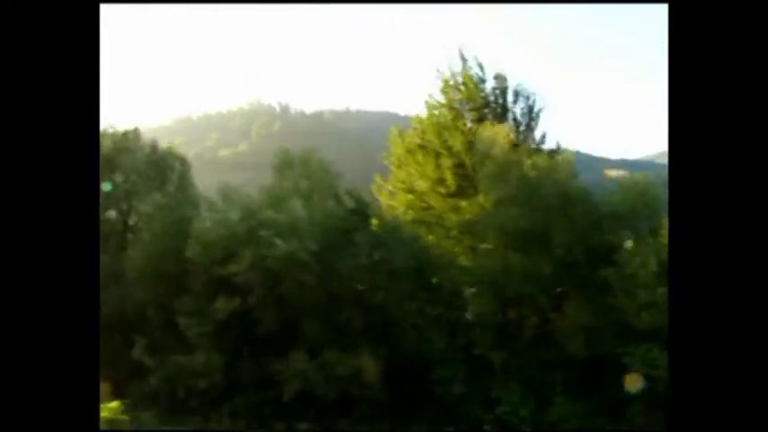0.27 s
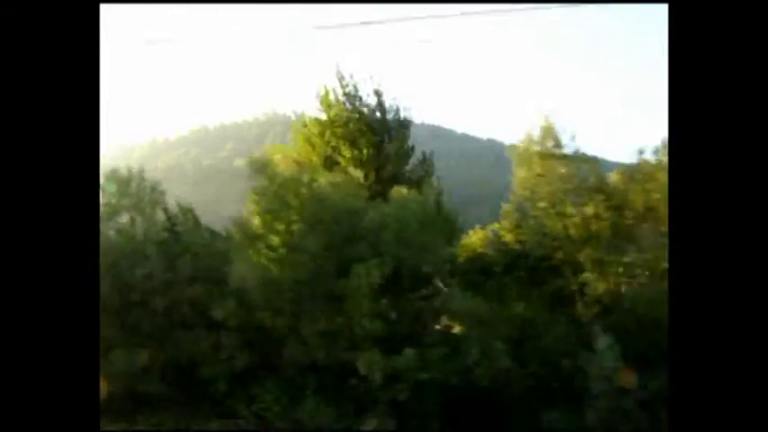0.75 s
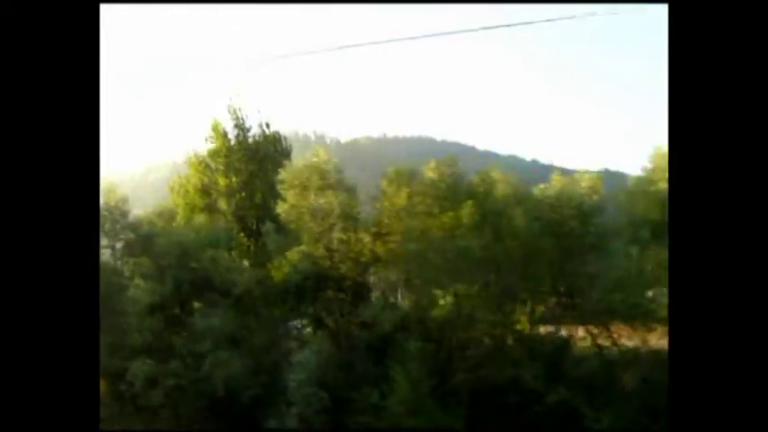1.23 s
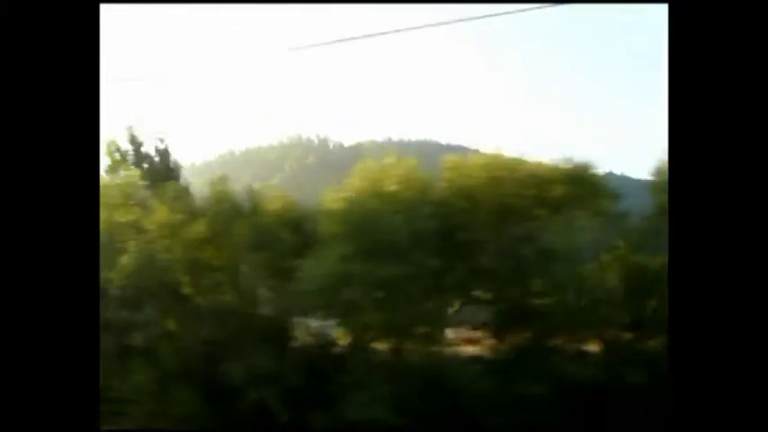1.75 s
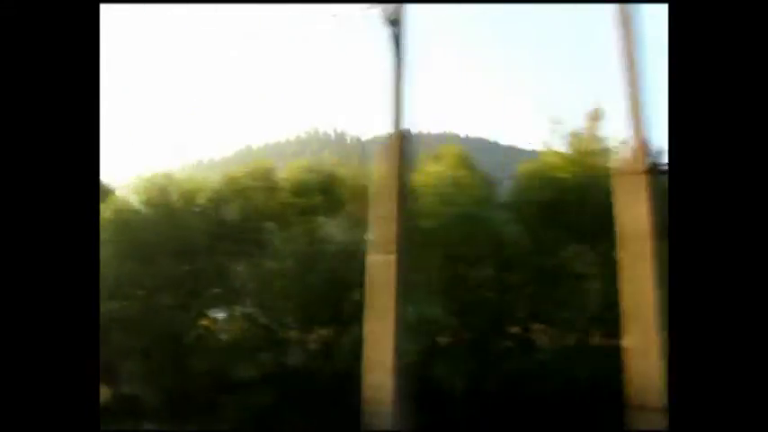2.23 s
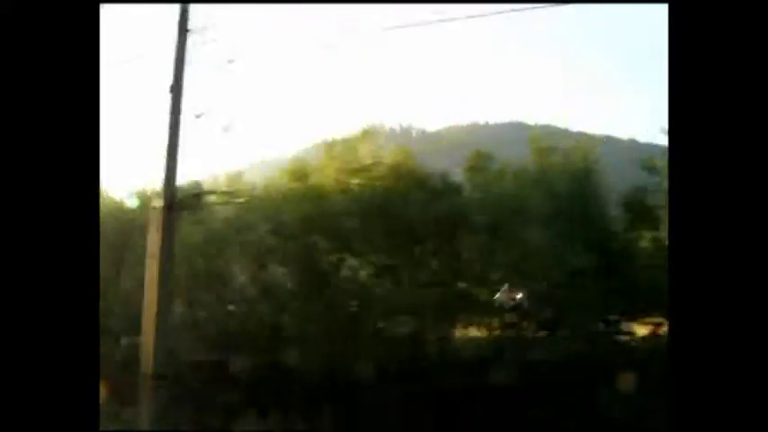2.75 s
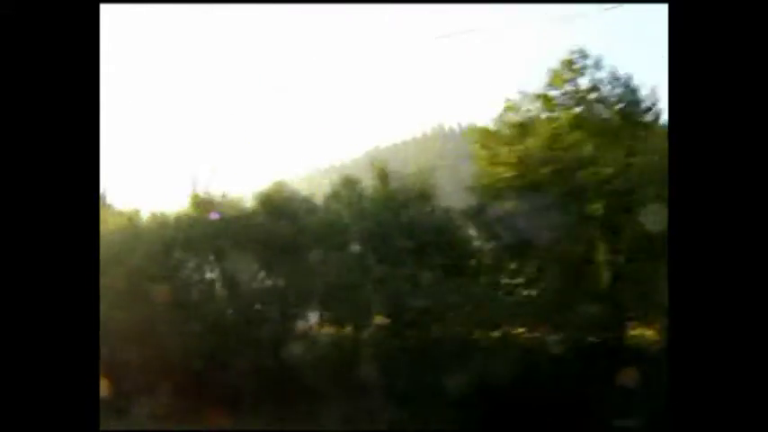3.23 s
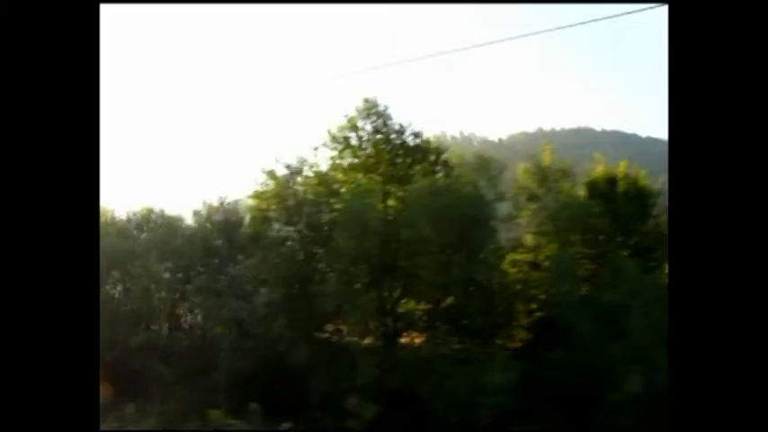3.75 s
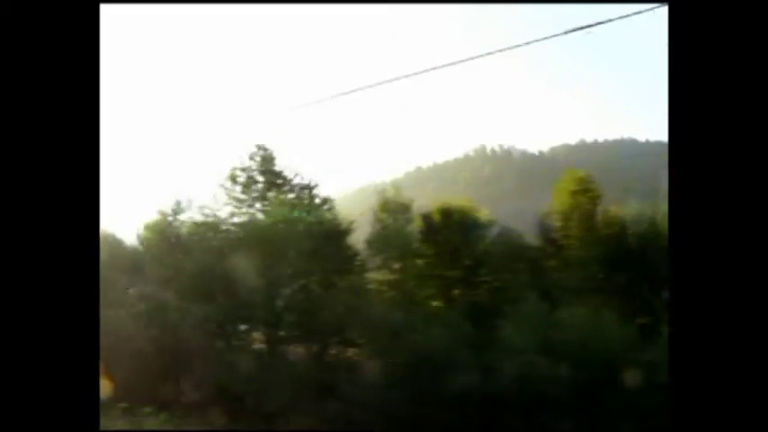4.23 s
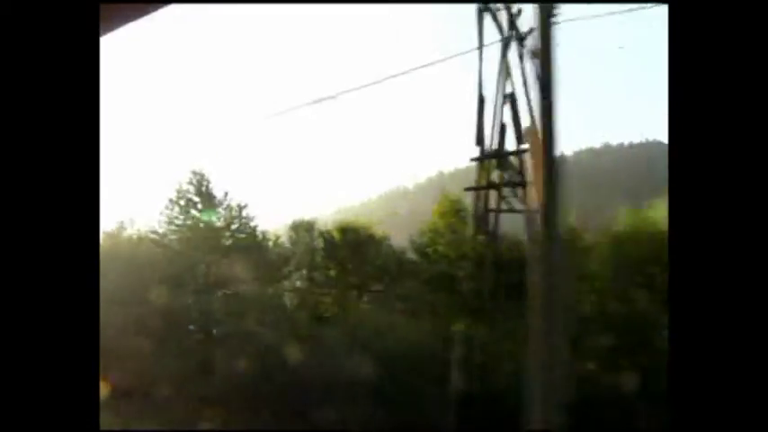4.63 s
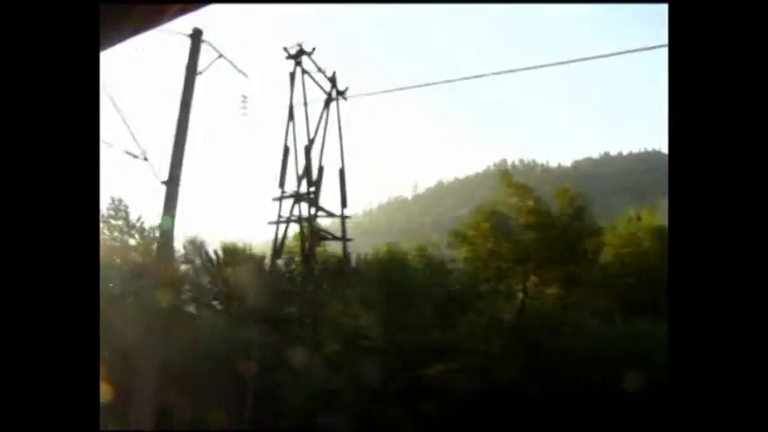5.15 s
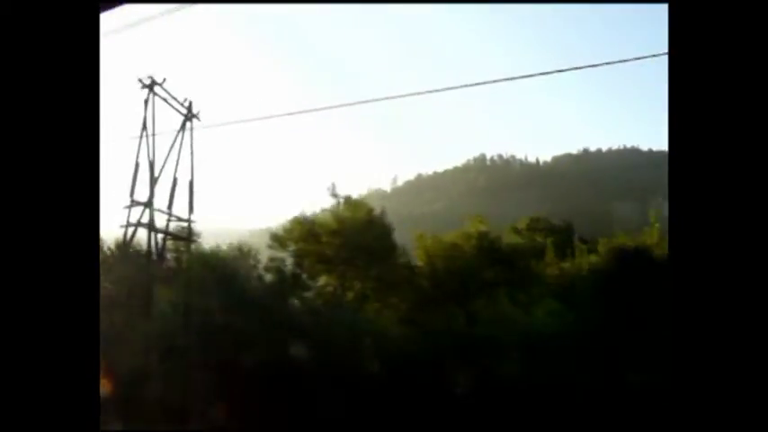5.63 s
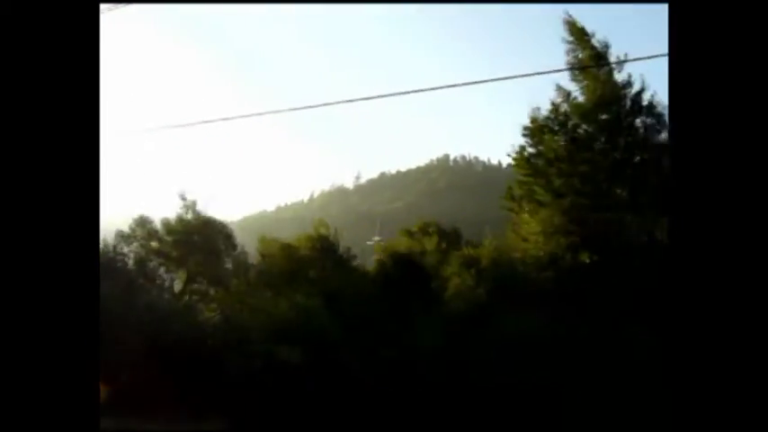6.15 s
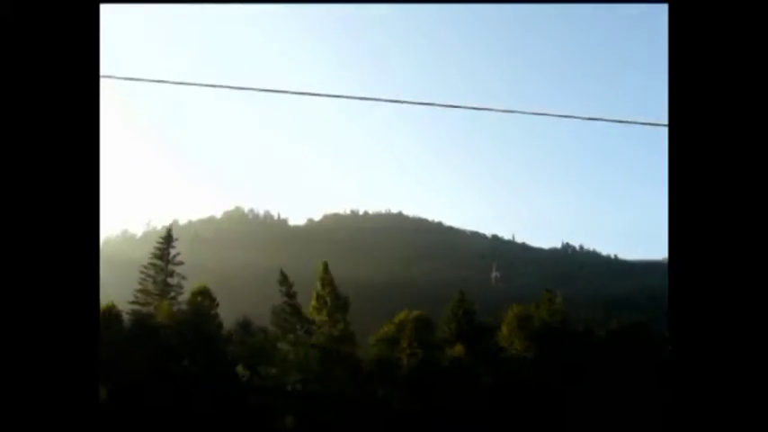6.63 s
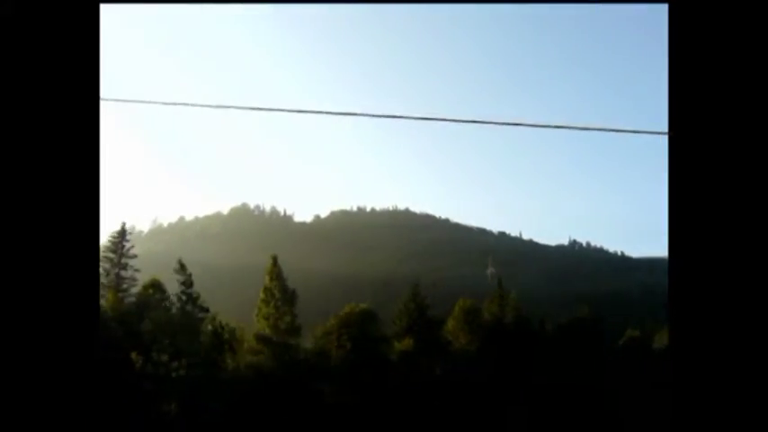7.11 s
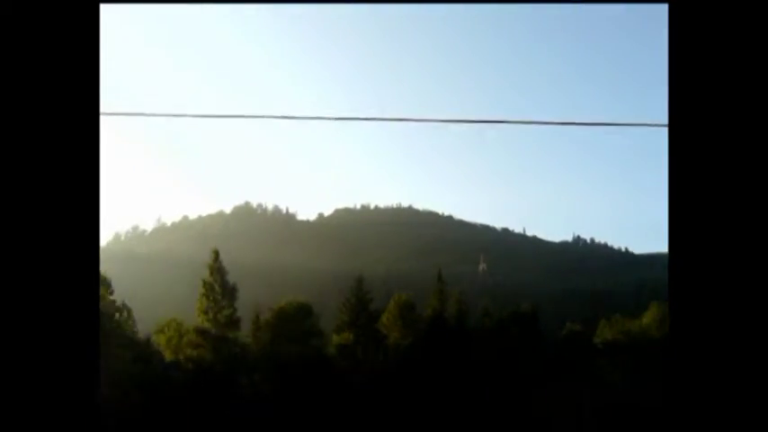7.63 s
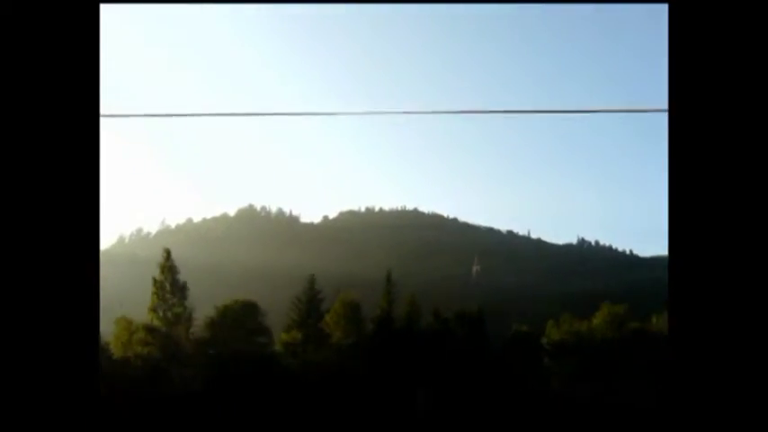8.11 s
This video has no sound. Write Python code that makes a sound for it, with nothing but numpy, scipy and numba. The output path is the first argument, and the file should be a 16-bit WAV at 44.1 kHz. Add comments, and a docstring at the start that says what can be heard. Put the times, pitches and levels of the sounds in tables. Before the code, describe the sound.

Muffled train roar with paired rail-joint knocks and buffeting wind, jumping after six seconds to a much louder, thumping, wind-battered stretch.

```python
"""A passenger train rolls along, heard from an open carriage window on a small camera: an uneven roar and hiss
of wheels, far stronger on a new stretch of track after 6.35 s, with double knocks, fluttering wind and sharp pops.
The roar is shaped noise exciting drifting resonances; at each joint two noisy contacts ring a bogie.
The wind is noise in gusts, lopsided pressure swings and single spikes on the microphone.
A gain control starts turned down, ducks under sounds above its limit and creeps back."""
import sys
import numpy as np
from scipy import signal
from scipy.fft import rfft, irfft
from scipy.io import wavfile
from scipy.ndimage import map_coordinates
from numba import njit

SR = 44100
rng = np.random.default_rng(int(sys.argv[2]) if len(sys.argv) > 2 else 0)


def generate_wav(signal):
    """Clip the signal to [-1, 1] and save it as 16-bit WAV at the path in sys.argv[1]."""
    frames = np.transpose(np.atleast_2d(signal))
    scaled = np.clip(frames, -1, 1) * 32767
    pcm = np.round(scaled).astype(np.int16)
    wavfile.write(sys.argv[1], SR, pcm)


N = 369116
TIME = np.arange(N) / SR
TOP_HZ = 4800  # upper edge of the camera's pass band


def undb(db):
    """Level definition: decibels to amplitude gain."""
    return 10 ** (np.asarray(db) / 20)


def unit(x):
    """Normalisation: scale to rms 1."""
    return x / np.sqrt(np.mean(x ** 2))


def curve(rows):
    """Linear interpolation: join (s, value) rows by straight lines."""
    return np.interp(TIME, *np.transpose(rows))


def walk(rate):
    """Band-limited fluctuation: random values, rate per second, joined by lines; spread near 1."""
    knots = rng.standard_normal(2048)
    return 1.04 * np.interp(TIME * rate, np.arange(len(knots)), knots)


def soften(x, hz, order=2):
    """Low-pass filtering: Butterworth, with the cut-off held to the top of the pass band."""
    sos = signal.butter(order, min(hz, TOP_HZ), fs=SR, output="sos")
    return signal.sosfilt(sos, x)


def band(x, lo_hz, hi_hz, order=2):
    """Band-pass filtering: Butterworth, at least 10 Hz wide."""
    edges = [lo_hz, max(hi_hz, lo_hz + 10)]
    return signal.sosfilt(signal.butter(order, edges, "band", fs=SR, output="sos"), x)


def ring(x, hz, width):
    """Resonance: one damped mode, gain 1 at its centre; width in Hz."""
    return signal.lfilter(*signal.iirpeak(hz, hz / width, fs=SR), x)


def coloured(points):
    """Spectral shaping: weight the spectrum of white noise by (Hz, dB) points on a log frequency axis."""
    hz, db = np.transpose(points)
    freq = np.maximum(np.fft.rfftfreq(N, 1 / SR), 1)
    weight = undb(np.interp(np.log(freq), np.log(hz), db))
    return irfft(rfft(rng.standard_normal(N)) * weight, N)


def add(track, s, sound):
    """Superposition: mix a sound into the track at time s."""
    start = max(int(s * SR), 0)
    track[start:start + len(sound)] += sound[:N - start]


# Running noise at the window. Each row: time in seconds, level in dB before the rolling gain.
ROLLING_LEVEL = [(0, -38.5), (0.65, -44), (1.25, -38.5), (1.65, -39.5), (2.2, -41), (2.7, -38.5),
                 (3.4, -39.5), (3.75, -45.5), (4.08, -40), (4.3, -43.5), (4.8, -40.5), (5.8, -35.5),
                 (6.345, -37), (6.358, -24.5), (6.65, -23), (6.85, -20), (7.04, -21), (7.13, -27),
                 (7.7, -25.5), (7.9, -28.5), (8.36, -33)]
# Spectrum of the wheel roar. Each row: frequency in Hz, relative spectral level in dB.
ROAR_SPECTRUM = [(30, -17.5), (65, -6.5), (125, -9.5), (170, -7.5), (430, -6.5), (580, -7.5), (770, -9),
                 (910, -22), (1300, -21.5), (1900, -24), (2300, -17.5), (3400, -25), (3950, -34.5),
                 (4450, -36)]
# Hiss of the wheels against their roar. Each row: time in seconds, treble level in dB.
HISS_LEVEL = [(0, -3), (0.45, 1), (1.38, 2), (1.62, -2.5), (2.2, 0), (2.65, 3), (3.3, -0.5), (3.7, 3),
              (4.2, 0.5), (4.9, 0), (5.5, -0.5), (6.55, 0), (6.63, -3), (6.72, -0.5), (6.87, 0), (7.05, -2),
              (7.9, -1.5)]
# Resonances of bogie and carriage, which the joints ring too. Each row: frequency in Hz, width in Hz,
# relative level in the roar in dB, relative level in a knock in dB.
BOGIE_MODES = [(258, 35, 1.5, 9), (374, 44, -1.5, 3), (528, 69, -19.5, 4.5), (631, 20, -17, -1.5),
               (794, 88, -14, -5), (994, 59, -11, -12), (1080, 130, -32.5, -27.5), (1584, 90, -14.5, -31),
               (2120, 54, -31.5, -23), (3050, 140, -28, -29)]


def rolling(shake_db=0.66, hiss_flicker_db=2.1, mode_swell_db=2.5, mode_drift=0.02, rattle_db=3, gain_db=11):
    """Forced vibration: rail roughness drives wheels and an unevenly rattling body whose resonances drift."""
    roar = coloured(ROAR_SPECTRUM)
    body = signal.sosfiltfilt(signal.butter(2, 1200, fs=SR, output="sos"), roar)
    hiss = (roar - body) * undb(curve(HISS_LEVEL) + hiss_flicker_db * walk(14))
    rattle = unit(undb(rattle_db * walk(45)))
    for hz, width, db, _ in BOGIE_MODES:
        drive = soften(rng.standard_normal(N), 3000, order=6) * rattle
        # reading at a wandering speed shifts the pitch of the mode
        clock = np.cumsum(1 + mode_drift * walk(5))
        ringing = map_coordinates(ring(drive, hz, width), [clock], order=1, mode="mirror")
        body = body + ringing * undb(db + mode_swell_db * walk(8.1))
    shaken = body * undb(shake_db * walk(28))
    return unit(shaken + hiss) * undb(curve(ROLLING_LEVEL) + gain_db)


AXLE_GAP_S = 0.154  # the trailing wheel of a bogie meets the joint this much later
TRAIL_HARDNESS = 0.47  # its contact is softer: share of the leading wheel's cut-off
THUD_TOP_HZ = 450  # modes below this belong to the deep thud
# Bogies crossing rail joints. Each row: start in seconds, leading wheel level in dB, trailing wheel level
# in dB, hardness of the leading contact as a cut-off in Hz, relative share of the deep thud in dB.
RAIL_JOINTS = [(0.009, -24, -23, 1300, 1), (0.562, -52, -25.5, 950, -5.5), (0.847, -28.5, -25, 800, -13),
               (1.184, -18.5, -18, 1400, -1.5), (2.312, -27.5, -24.5, 2020, -18.5),
               (2.786, -15, -18.5, 1400, 0), (3.194, -23.5, -34, 1076, -6.5),
               (4.378, -25.5, -24.5, 696, -1.5), (4.47, -28.5, -22, 1105, 0),
               (5.497, -26.5, -21, 2180, -13), (5.969, -13.5, -12, 960, 3), (6.370, -8, -9.5, 800, 0.5),
               (7.221, -12.5, -10, 1230, 5), (7.524, -10, -4.5, 1380, 2), (7.949, -7, -8, 1200, 4.5)]


def joints(rise_s=0.004, hold_s=0.013, decay_s=0.012, damping=1.7, tail_db=-23, tail_s=0.1,
           thud_db=-3, ring_db=-1, zing_db=-27, zing_s=0.012):
    """Impact excitation: each wheel's short chattering contact at a joint rings the bogie, and steel hisses."""
    out, t = np.zeros(N), np.arange(SR // 4) / SR
    release = np.exp(-np.maximum(t - hold_s, 0) / decay_s)
    tail = undb(tail_db) * np.exp(-t / tail_s)
    contact = np.minimum(t / rise_s, 1) * (release + tail)
    zing_shape = t / zing_s * np.exp(1 - t / zing_s)
    for start, lead_db, trail_db, lead_hz, deep_db in RAIL_JOINTS:
        leading = start, lead_db, lead_hz
        trailing = start + AXLE_GAP_S, trail_db, lead_hz * TRAIL_HARDNESS
        for s, db, hard_hz in (leading, trailing):
            chatter, steel = rng.standard_normal((2, len(t)))
            force = contact * chatter
            knock = undb(thud_db + deep_db) * unit(band(force, 200, 330))
            for hz, width, _, mode_db in BOGIE_MODES:
                share_db = mode_db + ring_db + deep_db * (hz < THUD_TOP_HZ)
                knock = knock + undb(share_db) * unit(ring(force, hz, width * damping))
            # the floor muffles every knock, and a soft contact is duller still
            knock = soften(soften(knock, hard_hz), 2400, order=3)
            blow = knock[:SR // 40]  # the first 25 ms set the level
            zing = unit(band(steel, 1800, 3900, order=3)) * zing_shape
            add(out, s - rise_s, undb(db) * (knock / np.std(blow) + undb(zing_db) * zing))
    return out


# Strong eddies hitting the microphone. Each row: start in seconds, length in seconds (held to 46 ms at most),
# relative level in dB, centre frequency in Hz, relative crackle level in dB.
STRONG_EDDIES = [(0.002, 0.034, -14.5, 222, -21), (0.248, 0.018, -23.5, 111, -15),
                 (0.315, 0.026, -11.5, 210.3, -19), (0.531, 0.035, -31.5, 110, -26),
                 (0.73, 0.026, -25.5, 149.5, -21), (0.994, 0.052, -25.5, 197.5, -25),
                 (1.104, 0.014, -20.5, 118, -31), (1.663, 0.012, -6, 349, -16),
                 (1.767, 0.041, -27.5, 197, -21), (2.01, 0.018, -18, 163, -27),
                 (2.033, 0.017, -19, 255, -22), (2.175, 0.03, -30, 133, -27),
                 (2.755, 0.017, -5.5, 175, -20.5), (2.7625, 0.0095, -9, 414, -3),
                 (2.7655, 0.0075, -11.5, 715, 3.5), (2.773, 0.0095, -6, 478, -8),
                 (2.793, 0.022, -9, 162, -18), (3.441, 0.025, -6.5, 163, -15.5),
                 (3.449, 0.0078, -9.5, 383, -7), (4.14, 0.081, -27, 184, -40),
                 (4.864, 0.007, -14, 341.4, -8.5), (4.873, 0.013, -13.5, 227, -16.5),
                 (4.905, 0.041, -34, 140, -32), (5.209, 0.039, -26.5, 225, -30),
                 (5.246, 0.041, -26, 156, -23), (5.417, 0.03, -30, 275.5, -26),
                 (5.752, 0.036, -18.5, 107.7, -22.5), (5.769, 0.025, -15.5, 200, -27),
                 (6.34, 0.035, -25.5, 104, -16.5), (6.584, 0.011, -4.5, 401, -18.5),
                 (6.609, 0.019, -4, 318, -22), (6.666, 0.021, -10, 239, -35), (7.048, 0.026, -8, 141, -34),
                 (7.067, 0.014, 5, 337, -6), (7.222, 0.023, 0.5, 219.4, -26), (7.243, 0.0078, 3, 200, -15),
                 (7.367, 0.028, -5.5, 227, -25), (7.399, 0.013, -1, 169, -39), (7.413, 0.019, -1, 247, -17),
                 (7.512, 0.015, 4, 222, -23.5), (7.7988, 0.0057, -1, 770, -13.5),
                 (7.802, 0.026, -1.5, 191, -19), (7.948, 0.05, -26.5, 74, -33),
                 (8.006, 0.019, -12, 130, -37), (8.101, 0.018, -12, 240, -12.5),
                 (8.258, 0.015, 2, 122.3, -21), (8.297, 0.009, -7, 592, -16)]


def eddies(edge=0.58, spread=0.64, churn_hz=320, weight=0.44, skew=0.5, tear=2.5, rasp=0.25, slowest=0.23,
           crackle_lo_hz=680, crackle_hi_hz=2200, reach_db=36, gain_db=1, crackle_db=-1.5):
    """Turbulent pressure: an eddy is a few lopsided swings; the overdriven microphone crackles throughout,
    hardest on their crests."""
    out, size = np.zeros(N), 4096
    for s, length, db, hz, tear_db in STRONG_EDDIES:
        count = int(np.clip(length * SR, 64, size / 2))
        shape = np.pad(signal.windows.tukey(count, edge), (0, size - count))
        swirl, grit = rng.standard_normal((2, size))
        # the pace of the swings wanders, and the slow ones are the strong ones
        wander = soften(swirl, churn_hz)
        wander = (wander - wander[:count].mean()) / wander[:count].std()
        pace = np.exp(spread * np.clip(wander, -2, 2))
        cycles = rng.random() + np.cumsum(hz * pace) / SR
        swing = np.sin(2 * np.pi * cycles) / pace ** weight
        lopsided = swing + skew * (swing ** 2 - 0.5)
        pressure = soften(lopsided * shape, 2100, order=4)
        # the louder the crackle, the higher it reaches
        reach_hz = min(crackle_hi_hz * 2 ** ((tear_db + 19.5) / reach_db), TOP_HZ)
        crests = np.abs(pressure) / np.abs(pressure).max()
        cracks = grit * (crests ** tear + rasp * shape)
        crackle = soften(band(cracks, crackle_lo_hz, reach_hz, order=4), 4200)
        # the microphone does not follow the very slowest push
        pressure = band(pressure, hz * slowest, 1300)
        burst = unit(pressure) + undb(tear_db + crackle_db) * unit(crackle)
        # refer the level to the eddy's own length instead of the whole buffer
        add(out, s, burst * np.sqrt(count / size) * undb(db + gain_db))
    return out


# Single sharp pops of air on the microphone. Each row: time of the spike in seconds, relative peak level in dB,
# centre frequency in Hz, highest reach in Hz.
AIR_POPS = [(0.3224, 2.5, 400, 4200), (0.3288, -19, 200, 1300), (1.6643, -0.5, 120, 660),
            (1.6668, -7, 797, 4200), (1.782, -14, 600, 1610), (2.073, -6.5, 200, 1500),
            (2.683, -12, 170, 606), (2.7642, 8.5, 307, 3400), (2.802, -1, 380, 1800),
            (2.945, -10, 210, 1500), (3.446, -4, 254, 3040), (3.453, -5.5, 480, 3600),
            (3.592, -4.5, 170, 556), (4.1155, -8, 200, 1610), (4.1219, 1.5, 140, 1990),
            (4.867, -10.5, 520, 3530), (4.8776, -8.5, 300, 1410), (5.789, -9.5, 400, 1300),
            (6.3534, -8, 698, 4530), (7.113, 4.5, 230, 810), (7.223, 3, 600, 1180), (7.2477, 10, 700, 2400),
            (7.256, 8, 350, 1390), (7.374, -2, 397, 1410), (7.4194, 3, 300, 1840), (8.235, -11, 300, 900),
            (8.2679, 10, 900, 2930), (8.296, 2.5, 260, 1100)]


def pops(fall=1.4, lean=0.21, gain_db=0.5):
    """Vortex pressure pulse: one spike with a shallow dip on either side, leaning by a random phase."""
    out, size = np.zeros(N), 2048
    freq = np.fft.rfftfreq(size, 1 / SR)
    for (s, db, hz, reach_hz), tilt in zip(AIR_POPS, rng.standard_normal(len(AIR_POPS))):
        power = (freq / hz) ** 2
        hump = power / (1 + power) ** (1 + fall / 2)
        edge = 1 / (1 + (freq / reach_hz) ** 6)
        spike = np.fft.fftshift(irfft(hump * edge * np.exp(1j * lean * tilt), size))
        add(out, s - size / 2 / SR, spike / np.abs(spike).max() * undb(db + gain_db))
    return out


# Strength of the slipstream at the window. Each row: time in seconds, relative level in dB.
DRAUGHT_LEVEL = [(0, -35), (0.1, -44), (0.25, -28), (0.45, -46), (0.8, -35.5), (1.0, -27.5), (2.1, -31),
                 (2.35, -38), (3.7, -43.5), (3.85, -33), (4.15, -31), (4.35, -38), (5.02, -36.5),
                 (5.25, -30), (5.6, -36.5), (6.1, -28), (6.3, -33.5), (6.55, -14.5), (6.9, -30.5),
                 (7.6, -21), (8.36, -20)]


def slipstream(gust_db=6, gain_db=-3.0, wake_db=-19, build_s=0.012, wake_s=0.0082):
    """Turbulence noise: small eddies flutter in quick, uneven gusts and crowd around each strong one."""
    flutter = band(rng.standard_normal(N), 50, 190) * undb(gust_db * np.tanh(walk(30)))
    strength = undb(curve(DRAUGHT_LEVEL) + gain_db)
    t = np.arange(-SR // 10, SR // 3) / SR
    wake = np.exp(np.minimum(t / build_s, -t / wake_s))
    for s, _, db, _, _ in STRONG_EDDIES:
        add(strength, s + t[0], undb(db + wake_db) * wake[s + t >= 0])
    return unit(flutter) * strength


def scene():
    """Superposition: running noise, knocks and wind add at the microphone."""
    return (rolling() + joints() + eddies() + pops() + slipstream())[None]


@njit
def gain_cut(excess, start, fall, charge, creep, deepest):
    """Two-stage detection, in dB: a quick stage holds each peak and lets go; a slow one charges and creeps back."""
    cut, quick, slow = np.empty(len(excess)), 0., start
    for i in range(len(excess)):
        quick = max(excess[i], quick - fall)
        if excess[i] > slow:
            slow += (quick - slow) * charge
        slow = min(max(slow - creep, 0.), deepest)
        cut[i] = max(quick, slow)
    return cut


def gain_control(x, limit_db=-16, start_cut_db=13.0, sense_s=0.0015, quick_db_per_s=115,
                 charge_s=0.011, slow_db_per_s=3.0, deepest_db=13.0):
    """Dynamic compression: sound above the limit turns the camera down; deepest_db bounds the slow cut."""
    keep = np.exp(-1 / (sense_s * SR))
    power = signal.lfilter([1 - keep], [1, -keep], x ** 2)
    level_db = 10 * np.log10(power + 1e-12)
    cut_db = gain_cut(level_db - limit_db, float(start_cut_db), quick_db_per_s / SR,
                      1 / (charge_s * SR), slow_db_per_s / SR, float(deepest_db))
    return x * undb(-cut_db)


def record(dry, ceiling=0.78, self_noise_db=-58, bass_cut_hz=30):
    """Saturation and band-limiting: the camera rides its gain, rounds peaks, adds faint hiss and narrows the band."""
    hiss = undb(self_noise_db) * rng.standard_normal(N)
    rounded = ceiling * np.tanh(gain_control(dry[0]) / ceiling)
    dull = soften(rounded + hiss, 3800, order=7)
    thin = signal.sosfilt(signal.butter(1, bass_cut_hz, "high", fs=SR, output="sos"), dull)
    return signal.sosfilt(signal.ellip(8, 0.2, 80, TOP_HZ, fs=SR, output="sos"), thin)[None]


dry = scene()
out = record(dry)
generate_wav(out)
```